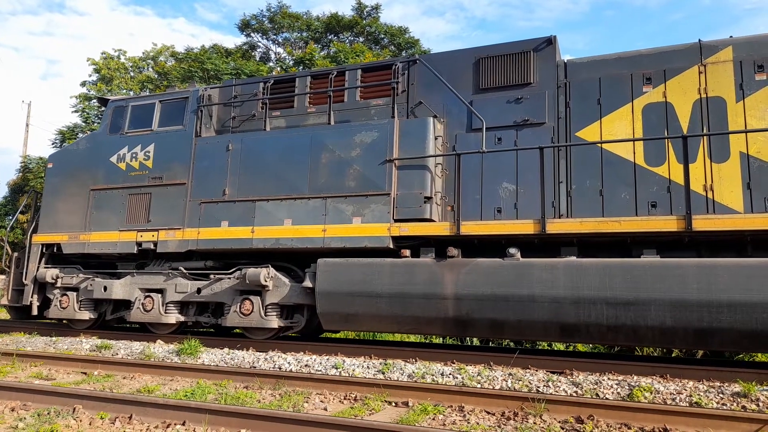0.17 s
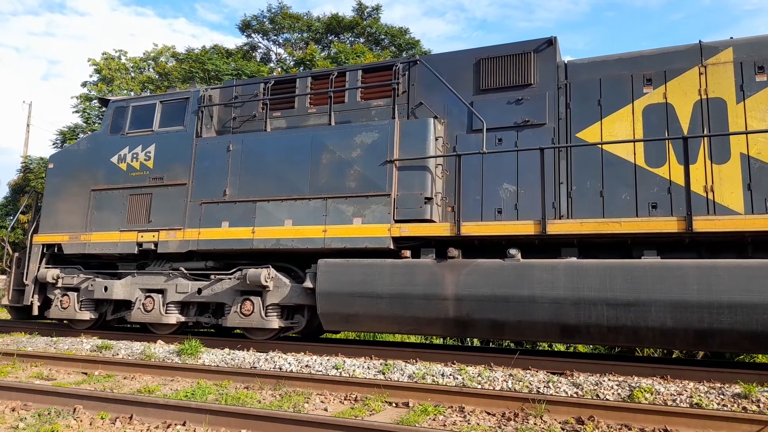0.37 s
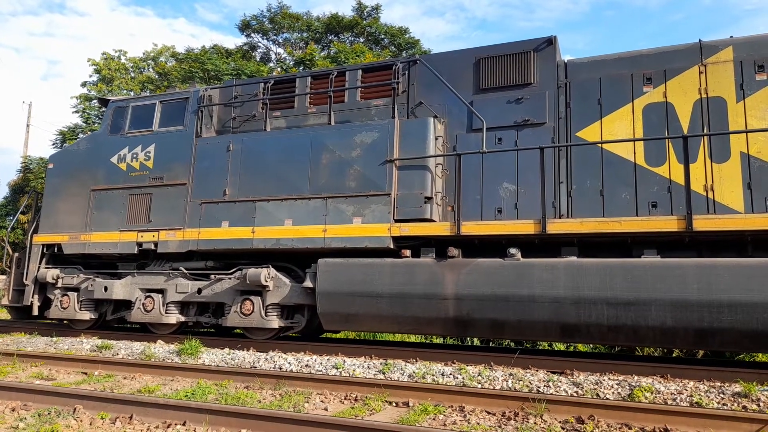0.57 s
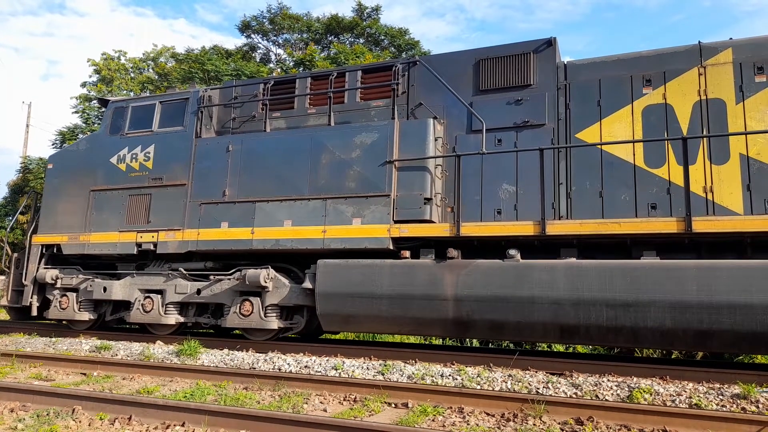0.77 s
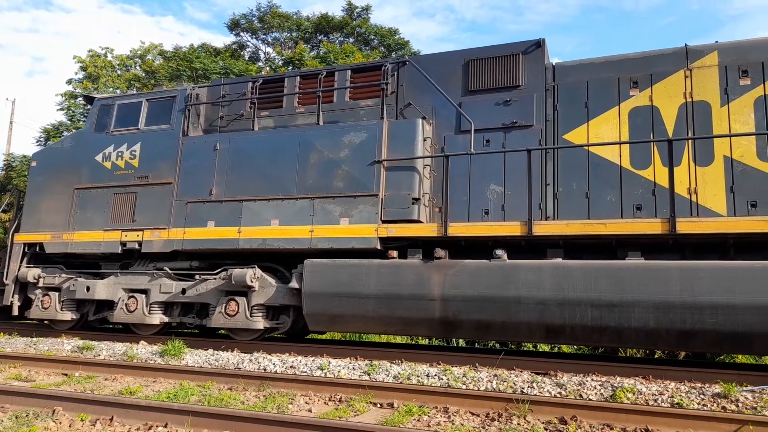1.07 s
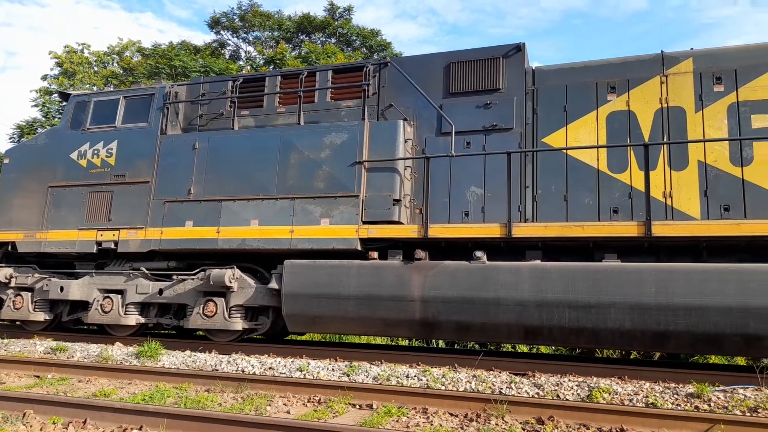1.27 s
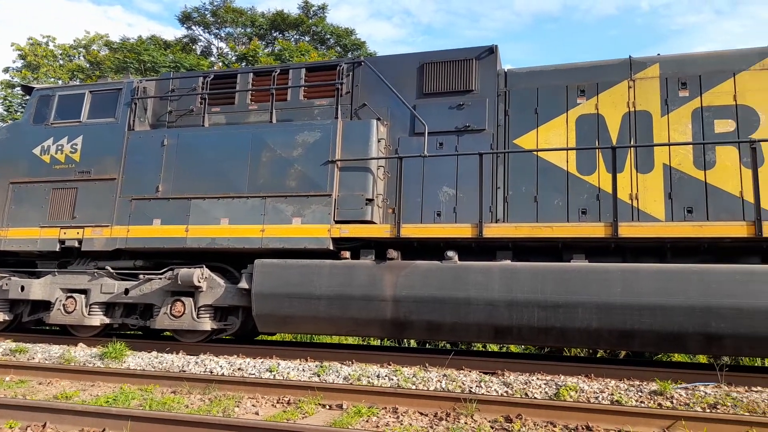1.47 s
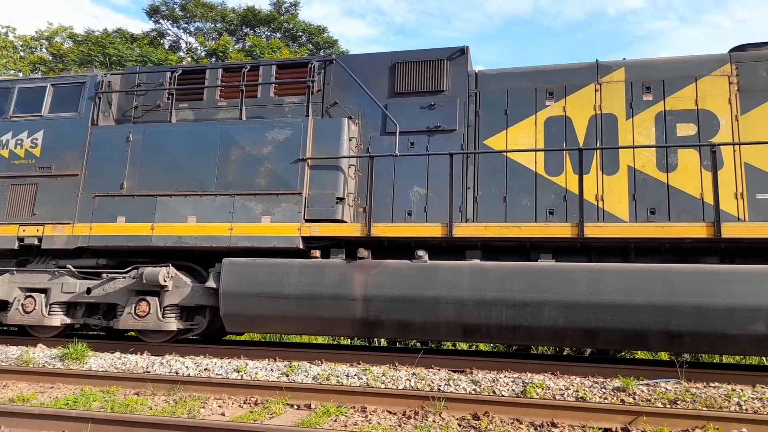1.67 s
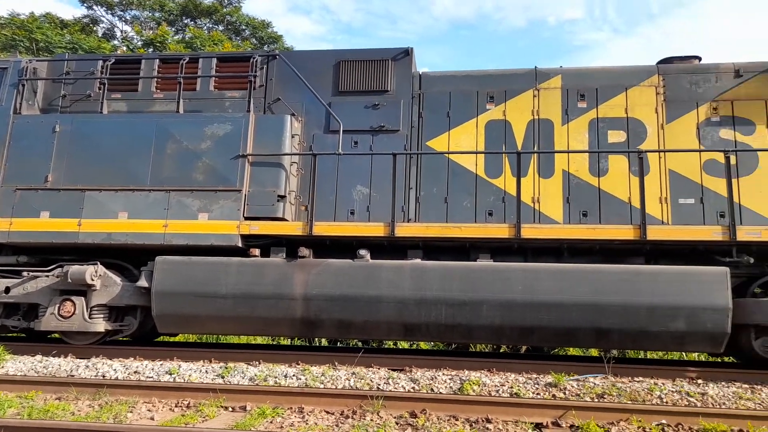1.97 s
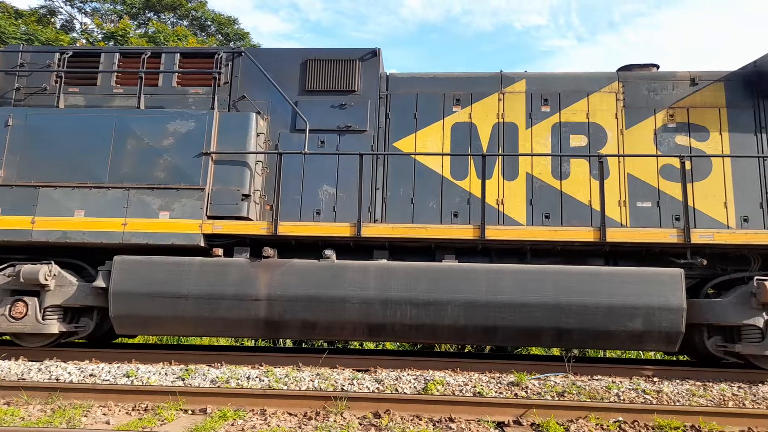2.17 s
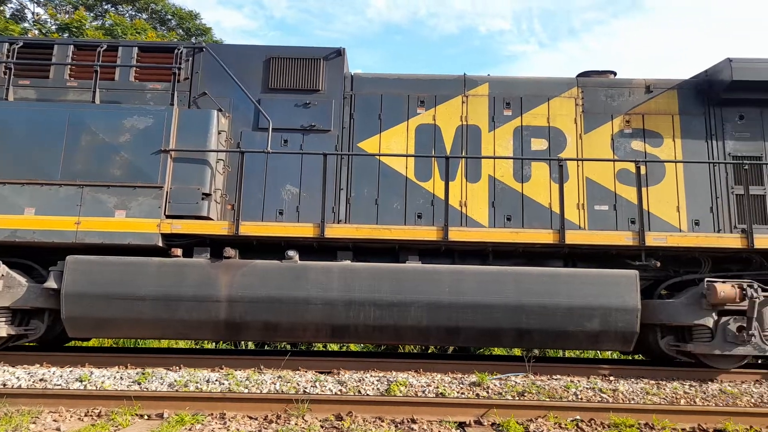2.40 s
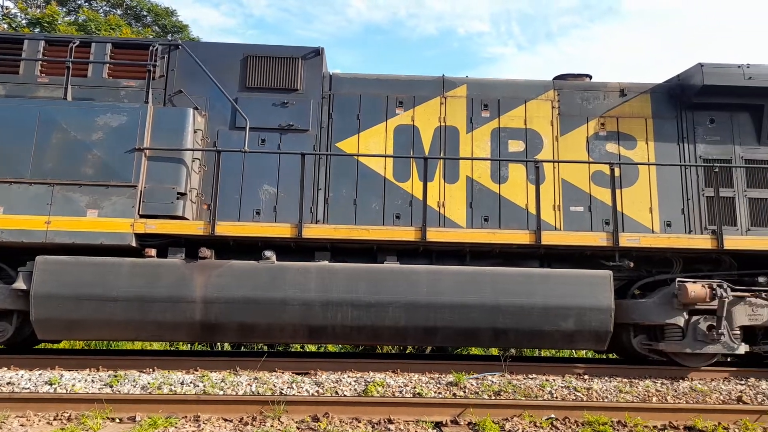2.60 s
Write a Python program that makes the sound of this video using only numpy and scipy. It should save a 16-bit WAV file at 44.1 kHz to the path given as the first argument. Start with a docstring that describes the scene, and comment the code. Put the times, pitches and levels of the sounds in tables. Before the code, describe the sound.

A large diesel locomotive idles nearby outdoors for about 2.7 seconds. Deep, uneven exhaust throbs and low roar run throughout, quickening slightly until 2.0, dipping, then settling. A mid-pitched hum, faint whine, fluttering metallic ring and dull knocks about every 0.3 seconds sit on top. Air hisses softly, mostly right, with a tiny spit at 0.1 and short, slightly rising swishes from 1.8 to 2.5.

```python
"""A sixteen-cylinder diesel locomotive idles outdoors, a few metres away; its speed climbs, dips and settles.
Uneven firing pulses throb through the exhaust stack; a blower and gears hum with the shaft, a fan holds its
own note. Bands of noise make the roar, the ringing steel and a dull knock about once a cycle.
Filtered noise makes air that hisses on the right, spits once and later escapes in rising swishes."""
import sys
import numpy as np
from scipy import signal
from scipy.fft import rfft, irfft
from scipy.io import wavfile
from scipy.ndimage import uniform_filter1d

SR = 44100
rng = np.random.default_rng(int(sys.argv[2]) if len(sys.argv) > 2 else 0)


def persist_wave(psi):
    """Save psi, clipped to +-1, as 16-bit WAV."""
    counts = np.round(np.clip(psi, -1, 1) * 32767).astype(np.int16)
    wavfile.write(sys.argv[1], SR, np.atleast_2d(counts).T)


N = 120834
T = np.arange(N) / SR  # seconds

# each cylinder's exhaust pulse, in firing order: relative_strength_db, lateness (firing intervals)
CYLINDERS = [(-0.5, 0.0059), (-9.5, 0.087), (1.6, -0.092), (0.7, 0.113), (2.5, 0.49), (-1.5, -0.057),
             (-1, -0.02), (-4.5, 0.062), (1.4, 0.04), (8, 0.2046), (5.5, -0.32), (-0.7, 0.012), (4, 0.022),
             (3, 0.138), (-1.4, 0.178), (-4.9, 0.37)]


def amp(db):
    """Decibels to gain."""
    return 10 ** (np.asarray(db) / 20)


def unit(x):
    """Scales to an rms of one."""
    return x / np.sqrt(np.mean(x ** 2) + 1e-20)


def curve(points, t=T):
    """Reads a table over time, in straight lines."""
    return np.interp(t, *np.transpose(points))


def read(points, hz):
    """Reads a table over log frequency."""
    f, value = np.transpose(points)
    return np.interp(np.log(hz + 1), np.log(f + 1), value)


def pan(db):
    """Left and right gains for a level difference; positive leans left."""
    return amp(np.array([np.atleast_1d(db), -np.atleast_1d(db)]) / 2)


def add(mix, s, sound):
    """Adds a sound to the mix at a time in seconds."""
    part = mix[..., max(round(s * SR), 0):][..., :sound.shape[-1]]
    part += sound[..., :part.shape[-1]]


def drift(rate_hz):
    """Smooth random wandering of rms one: noise under a Gaussian lowpass."""
    hz = np.fft.rfftfreq(2 * N, 1 / SR)
    spectrum = rfft(rng.standard_normal(2 * N))
    return unit(irfft(spectrum * np.exp(-(hz / rate_hz) ** 2))[:N])


def noise(shape, patchy_db):
    """Stereo noise of rms one with a given spectrum, its level patchy over time and frequency."""
    # left-right likeness: pitch_hz, correlation (0-1)
    likeness = [(60, .995), (250, .98), (500, .88), (700, .8), (1200, .74), (2000, .35), (4000, .1),
                (16000, .15)]
    # left-right balance: pitch_hz, left_minus_right_db
    balance = [(40, 0), (90, -2.5), (170, -0.5), (300, -4), (600, 1.5), (1200, 1.5), (2000, 1.5),
               (3000, -2), (4500, -4.5), (7000, -8), (10000, -9), (15000, -5)]
    hz = np.fft.rfftfreq(N, 1 / SR)
    a, b = rfft(rng.standard_normal((2, N)))
    same = np.clip(read(likeness, hz), -1, 1)
    pair = np.array([a, same * a + np.sqrt(1 - same ** 2) * b])
    x = irfft(pair * amp(read(shape, hz)) * pan(read(balance, hz)), N)
    z = signal.stft(x, nperseg=512)[2]
    patches = rng.standard_normal(z.shape[1:])
    patches = uniform_filter1d(patches, size=10, axis=0)  # smooth over frequency
    patches = unit(uniform_filter1d(patches, size=9, axis=1))  # smooth over time
    return unit(signal.istft(z * amp(patchy_db * patches))[1][:, :N])


def burst(length, hz, end_hz, width_hz):
    """A swelling and fading band of resonant noise that glides in pitch."""
    t = np.arange(0, length, 1 / SR)
    r = np.exp(-np.pi * width_hz / SR)
    z = rng.standard_normal(N) + 1j * rng.standard_normal(N)
    z = signal.lfilter([1], [1, -2 * r, r * r], z)[-len(t):]  # the tail, once the filter has settled
    turns = np.cumsum(hz + (end_hz - hz) * t / length) / SR
    return unit((z * np.exp(2j * np.pi * turns)).real) * np.sin(np.pi * t / length)


def tone(turns, waver):
    """A sine that wavers in strength and phase."""
    wander = 1 + waver * (drift(12.3) + 1j * drift(6.4))
    return np.sqrt(2) * (wander * np.exp(2j * np.pi * turns)).real


def air_leaks():
    """Steady hiss and finer sizzle of air: two noise bands that share one quick flutter in level."""
    # hiss spectrum: pitch_hz, relative_db (per Hz)
    hiss_shape = [(500, -25.5), (2000, 1), (2550, -1), (3050, 6), (3500, -1.5), (4450, 0.5), (5100, -3.5),
                  (6500, -5.5), (7100, -1), (7600, -5.5), (8100, -15.5), (10000, -17), (13000, -16.5),
                  (16000, -28)]
    # hiss level around its base: time_s, offset_db
    hiss_level = [(0, -1.5), (.4, 2), (.95, 1), (1.03, 2), (1.6, 0.5), (2.05, -0.5), (2.5, 0.5),
                  (2.74, 2.5)]
    # sizzle spectrum: pitch_hz, relative_db (per Hz)
    sizzle_shape = [(4000, -38), (8000, -8), (10000, -15), (11800, -4), (13500, -14), (15700, -21)]
    # sizzle level: time_s, level_db
    sizzle_level = [(0, -52), (.5, -56), (1.1, -58.5), (1.7, -59), (1.8, -61), (2.3, -61), (2.45, -55),
                    (2.74, -54)]
    hiss_db = -43
    flutter = drift(38)
    hiss = noise(hiss_shape, patchy_db=1.4) * amp(hiss_db + curve(hiss_level) + 0.34 * flutter)
    sizzle = noise(sizzle_shape, patchy_db=1.5) * amp(curve(sizzle_level) + 0.76 * flutter)
    return hiss + sizzle


def air_spit():
    """One short spit of air: bright noise under a bell-shaped envelope."""
    # spectrum: pitch_hz, relative_db (per Hz)
    spit_shape = [(4000, -30), (8000, -6), (12000, 0), (15700, -1)]
    peak_s, spread_s, spit_db = 0.096, 0.04, -52
    envelope = np.exp(-((T - peak_s) / spread_s) ** 2)
    return noise(spit_shape, patchy_db=.8) * amp(spit_db) * envelope * pan(db=4)


def air_swishes():
    """Escaping air that climbs in pitch: a wide rush for each ear and a narrow core common to both."""
    # swishes: start_s, length_s, first_hz, last_hz, width_hz, level_db (before the swell), left_minus_right_db
    swishes = [(1.82, .06, 3030, 3040, 100, -47, 0), (2.05, .11, 485, 520, 10, -33, 6),
               (2.17, .19, 2800, 3100, 320, -40, 0), (2.29, .2, 608, 622, 8, -41, 2),
               (2.31, .18, 4440, 4870, 380, -42.5, -7)]
    core_width_share, core_db = .12, -4  # core against rush
    out = np.zeros((2, N))
    for s, length, hz, end_hz, width, db, side in swishes:
        rush = np.array([burst(length, hz, end_hz, width) for _ in range(2)])
        core = amp(core_db) * burst(length, hz, end_hz, width * core_width_share)
        add(out, s, amp(db) * pan(side) * (rush + core) / np.hypot(1, amp(core_db)))
    return out


def fan():
    """Wavering sines at fixed pitches: the fan keeps its own speed."""
    # fan tones: pitch_hz, base_level_db, left_minus_right_db
    fan_tones = [(483.3, -41, .5), (964, -58.5, -16), (2842, -68, -3), (6757, -72, -6)]
    # level of all fan tones together: time_s, offset_db
    fan_level = [(0, 1), (.5, 3.5), (1.2, -1), (2.0, 2), (2.74, 1)]
    tones = sum(amp(db) * pan(side) * tone(hz * T, waver=.13) for hz, db, side in fan_tones)
    return tones * amp(curve(fan_level))


def blower(cycles):
    """A wavering hum whose pitch is a fixed multiple of the engine cycle."""
    # hum level: time_s, level_db
    blower_level = [(0, -33), (.5, -35), (1.0, -36.5), (1.3, -31), (1.8, -32.5), (2.3, -30), (2.5, -36),
                    (2.74, -31.5)]
    tones_per_cycle = 71.68
    return amp(curve(blower_level)) * tone(tones_per_cycle * cycles, waver=.11) * pan(db=0.5)


def gears(cycles):
    """Two wavering whines whose pitches are fixed multiples of the engine cycle."""
    # upper whine: time_s, level_db
    high_level = [(0, -43.5), (.4, -39.5), (.9, -44), (1.25, -52), (1.6, -41.5), (1.9, -44.5), (2.3, -51),
                  (2.74, -44)]
    # lower whine: time_s, level_db
    low_level = [(0, -50), (.6, -46), (.9, -37.5), (1.2, -46), (1.5, -67), (2.74, -45)]
    high_order, low_order, waver = 212.4, 195.5, .14  # orders in periods per engine cycle
    whine = amp(curve(high_level)) * tone(high_order * cycles, waver)
    whine += amp(curve(low_level)) * tone(low_order * cycles, waver)
    return whine * pan(db=2.0)


def firing_pulse(cycles):
    """An even swing from -1 to 1, once per firing interval."""
    return np.cos(2 * np.pi * len(CYLINDERS) * cycles)


def roar(cycles):
    """Roar of the machinery: low-heavy noise that pulses with the firings."""
    # spectrum: pitch_hz, relative_db (per Hz)
    roar_shape = [(20, -23), (33, -23), (47, -4), (70, 1.5), (105, -0.5), (150, -5), (205, -14.5),
                  (275, -4.5), (340, -7.5), (450, -14), (620, -13), (770, -15.5), (870, -23.5), (1100, -17),
                  (1420, -28.5), (1700, -21.5), (2400, -32.5), (4000, -42), (16000, -78)]
    # level around the base: time_s, offset_db
    roar_level = [(0, -2), (.7, -1), (1.4, 0), (1.85, .5), (2.15, .8), (2.5, -.5), (2.74, -.5)]
    roar_db = -25
    return noise(roar_shape, patchy_db=0.82) * amp(roar_db + curve(roar_level) + .5 * firing_pulse(cycles))


def steel_ring(cycles):
    """The engine's steel rings near 1.9 kHz: a singing core in a noise skirt, both wandering in pitch."""
    # level of core and skirt together: time_s, level_db
    ring_level = [(0, -49), (.1, -41.5), (.17, -35.5), (.27, -41), (.46, -37), (.7, -41), (.87, -36.5),
                  (1.2, -40.5), (1.41, -32.5), (1.53, -39.5), (1.66, -32.5), (1.82, -40), (2.2, -35),
                  (2.6, -37), (2.74, -34)]
    # skirt spectrum before it is shifted to follow the core: pitch_hz, relative_db (per Hz)
    ring_shape = [(1000, -54), (1650, -25), (1830, 0.5), (1930, -4), (2020, -1), (2130, -12.5), (2400, -45),
                  (4000, -64)]
    # pitch of the singing core: time_s, pitch_hz
    sing_pitch = [(0, 1894), (.17, 1878), (.45, 1935), (.62, 1965), (1.08, 1930), (1.45, 2000), (1.9, 1941),
                  (2.25, 1939), (2.55, 1953), (2.74, 1963)]
    skirt_db, skirt_centre_hz = -1.5, 1937
    sing_db, sing_flutter_hz = -3.5, 28
    carrier = np.exp(2j * np.pi * np.cumsum(curve(sing_pitch)) / SR)
    sing = np.array([(carrier * (drift(sing_flutter_hz) + 1j * drift(sing_flutter_hz))).real
                     for _ in range(2)])
    # shift the skirt by the core's distance from the skirt's centre
    shift = carrier * np.exp(-2j * np.pi * skirt_centre_hz * T)
    skirt = (signal.hilbert(noise(ring_shape, patchy_db=1.5)) * shift).real
    level = amp(curve(ring_level) + 0.77 * firing_pulse(cycles))
    return (amp(skirt_db) * skirt + amp(sing_db) * sing) * level * pan(db=-0.5)


def knocks():
    """Dull knocks of the engine, about one a cycle: short narrow bursts of noise."""
    # knocks: centre_s, level_db (before the swell and pan), pitch_hz
    knock_list = [(.10, -36.5, 284), (0.389, -30.5, 271), (.68, -30, 281), (0.964, -28.5, 317),
                  (1.25, -28, 286.4), (1.529, -24, 281), (2.08, -33.5, 327.7), (2.351, -30, 313),
                  (2.62, -30, 292)]
    width_hz, length_s = 34.5, 0.06
    out = np.zeros(N)
    for s, db, hz in knock_list:
        add(out, s - length_s / 2, amp(db) * burst(length_s, hz, hz, width_hz))
    return out * pan(db=-4.0)


def exhaust(cycles):
    """One pulse per firing, each cylinder with its own strength and delay, booms through the stack."""
    # loudness of the pulses: time_s, offset_db
    load = [(0, -4.5), (.4, -1), (.8, 0.5), (1.3, 1.6), (1.8, -0.7), (2.3, 0), (2.74, -0.5)]
    # response of the exhaust stack: pitch_hz, relative_gain_db
    stack = [(20, -71), (36, -42), (43, -31.5), (47, -15.5), (58, -13), (72, -1.5), (86, -30.5), (102, -23),
             (130, -37.5), (200, -44.5), (400, -55.5), (1500, -92), (4000, -110), (16000, -135)]
    scatter_db, scatter_s = .35, .00012  # chance from firing to firing
    count = len(CYLINDERS)
    k = np.arange(-count, 11 * count)  # starts one cycle early so the stack already sounds
    chance = rng.standard_normal((len(k), 2))
    strength_db, late = np.array(CYLINDERS)[k % count].T
    slots = (k + late) / count  # firing moments in cycles
    at = np.interp(slots, cycles, T, right=T[-1] + 1)
    at += np.minimum(slots, 0) / (cycles[1] - cycles[0]) / SR  # early firings, at the starting speed
    size = amp(strength_db + curve(load, at) + scatter_db * chance[:, 0])
    pulses = np.zeros(N + 3 * SR)  # one second of lead-in
    np.add.at(pulses, np.round((at + 1 + scatter_s * chance[:, 1]) * SR).astype(int), -size)
    # minimum-phase impulse response of the stack
    log_gain = np.log(amp(read(stack, abs(np.fft.fftfreq(16384, 1 / SR)))))
    pipe = np.fft.ifft(np.exp(np.conj(signal.hilbert(log_gain)))).real[:len(log_gain) // 2]
    boom = signal.fftconvolve(pulses, pipe)[SR:SR + N]
    half_interval = N / (2 * count * cycles[-1])  # mean, in samples; scales the level
    return boom * half_interval * pan(db=-2.5)


def scene():
    """The engine cycle, two turns of the shaft, drives everything but the fan, the air and the knocks."""
    # shaft speed: time_s, speed (turns per minute)
    speed = [(0, 408), (.3, 408.1), (.6, 410.7), (.9, 417.2), (1.2, 425.6), (1.5, 435.5), (1.8, 444.2),
             (2.0, 445.8), (2.2, 440.1), (2.45, 436.3), (2.74, 440.2)]
    cycles = np.cumsum(curve(speed)) / SR / 120
    air = air_leaks() + air_spit() + air_swishes()
    hums = fan() + blower(cycles) + gears(cycles)
    machinery = roar(cycles) + steel_ring(cycles) + knocks()
    return air + hums + machinery + exhaust(cycles)


def record(dry):
    """Sound reaches the left microphone a little later; a steep lowpass then limits the band."""
    left_lag_s, edge_hz = .000136, 15720
    heard = np.array([np.roll(dry[0], round(left_lag_s * SR)), dry[1]])
    lowpass = signal.firwin(511, edge_hz, window=("kaiser", 9), fs=SR)
    return signal.oaconvolve(heard, lowpass[None], "same")


dry = scene()
out = record(dry)
persist_wave(out)
```